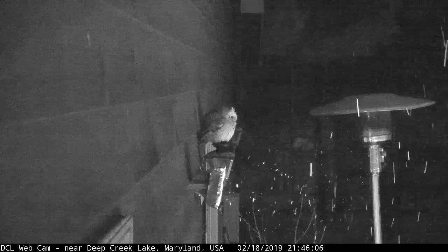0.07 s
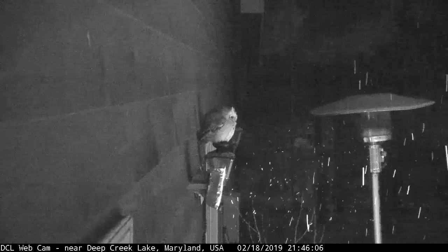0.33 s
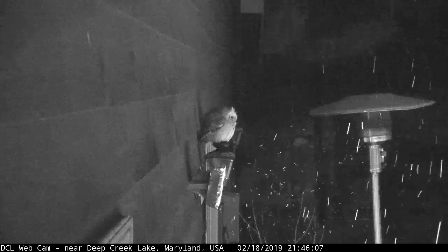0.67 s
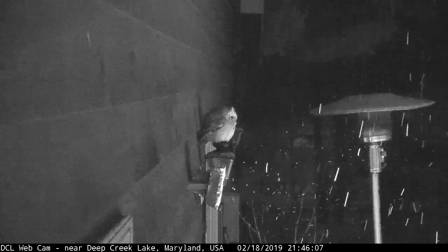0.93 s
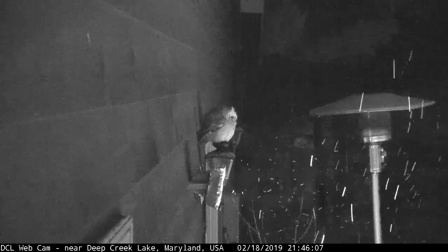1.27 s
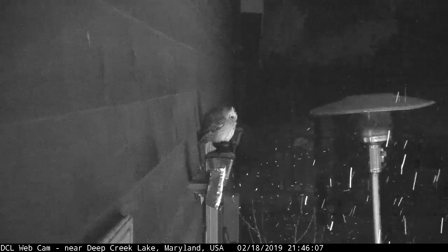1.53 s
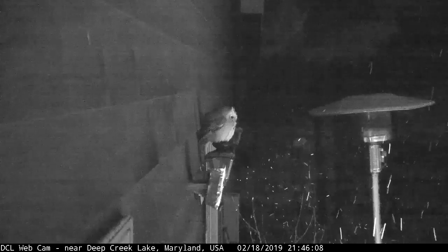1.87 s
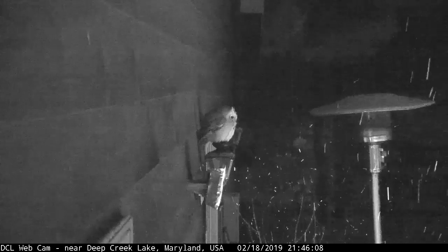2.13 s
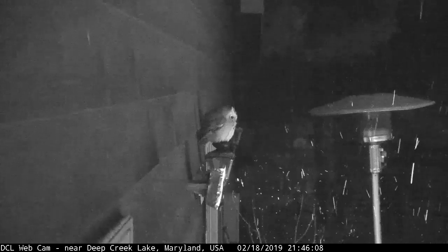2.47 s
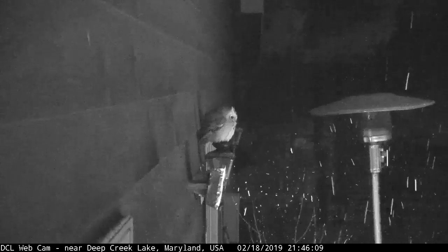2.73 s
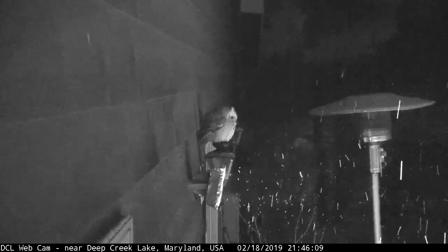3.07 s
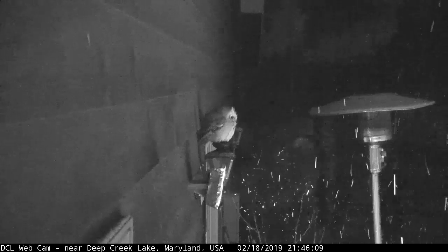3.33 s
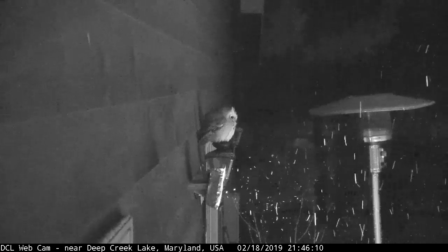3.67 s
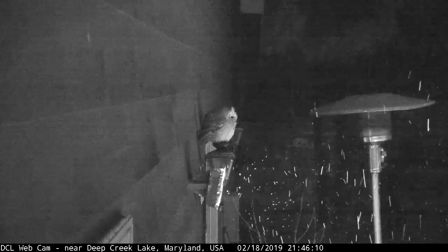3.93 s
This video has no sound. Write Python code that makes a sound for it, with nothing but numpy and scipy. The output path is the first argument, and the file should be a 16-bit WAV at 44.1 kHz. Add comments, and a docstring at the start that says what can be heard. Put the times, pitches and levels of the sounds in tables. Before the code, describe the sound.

A quiet, steady hiss of outdoor night air runs throughout, over a low rumble and a faint machine and electrical hum. Close by, a small mechanism ticks faintly at about 0.7, 1.8, 2.2, 2.8 and 3.8 seconds, and its tiny motor whirs very briefly at 0.8 and 2.2 seconds. From around 3.5 seconds, a soft gust reaches the microphone and the rumble swells.

```python
"""A quiet, snowy night on a deck

An outdoor camera's microphone hears an even hiss over a low rumble of air that swells at the end.
A turning machine and the mains electricity hum faintly. Close by, a small mechanism, probably
the lens drive, ticks now and then, making its casing ring, and twice whirs briefly."""
import sys
import numpy as np
from scipy import signal
from scipy.fft import rfft, irfft
from scipy.io import wavfile

SR = 44100
rng = np.random.default_rng(int(sys.argv[2]) if len(sys.argv) > 2 else 0)


def unload_wav(signal):
    """Save mono or channel-first audio to the path in sys.argv[1] as 16-bit WAV at rate SR, clipped to [-1, 1]."""
    wavfile.write(
        sys.argv[1],
        SR,
        np.round(np.clip(np.atleast_2d(signal).T, -1, 1) * 32767).astype(np.int16),
    )


N = 176400
TIME = np.arange(N) / SR

# Far air and microphone hiss. Each row: frequency in Hz, strength in dB per Hz.
HISS_SPECTRUM = [(60, -71.5), (130, -72), (165, -74), (220, -79), (300, -79), (430, -81.5), (550, -85.5),
                 (900, -86), (1200, -89.5), (2000, -92.5), (3200, -95.5), (5000, -98), (6900, -99),
                 (7500, -104)]
# The rumble of moving air. Each row: frequency in Hz, base strength in dB per Hz.
RUMBLE_SPECTRUM = [(4, -70), (10, -57.5), (25, -60), (38, -63), (58, -60), (78, -65.5), (110, -73.5),
                   (170, -91.5), (400, -115)]
# How the rumble ebbs and returns. Each row: time in seconds, change of level in dB.
RUMBLE_SWELL = [(0, 1), (0.6, -0.5), (1.1, -3), (2.0, 0.5), (3.0, -0.4), (4.0, 2)]
GUST_START_S, GUST_RISE_S, GUST_DB, GUST_EDGE_HZ = 3.53, 0.5, -32, 31.6

# The machine's tones. Each row: multiple of its turning rate, average level in dB.
MACHINE_TONES = [(1, -61), (2, -49.5), (3, -57), (4, -73.5), (5, -75)]
MACHINE_HZ, MACHINE_WANDER, MACHINE_FLUTTER_DB = 47.56, 0.0033, -0.4
# Mains hum and a faint drone. Each row: pitch in Hz, average level in dB.
STEADY_TONES = [(60, -55), (120, -63.5), (485.5, -80)]

# The ticks. Each row: start in seconds, level in dB, final pitch in Hz, gain of the casing's ring in dB.
TICK_EVENTS = [(0.7343, -47.8, 3100, -6), (.7738, -49.2, 3000, -7), (1.7600, -46.5, 3300, -12),
               (2.1740, -50, 2600, -8), (2.3318, -53, 2200, -13), (2.79, -56, 3700, 9.5),
               (3.806, -52, 3400, 2)]
TICK_S, TICK_FROM_HZ = 0.0032, 6520
REBOUND_DELAY_S, REBOUND_LENGTH_S, REBOUND_DB = 0.0041, 0.0015, -4.5
CASING_HZ, CASING_WIDTH_HZ = 5200, 810

# The whirs. Each row: start in seconds, length in seconds, whine level in dB,
# rattle level in dB compared with the whine.
WHIR_EVENTS = [(0.78, 0.13, -64, -1), (2.176, .153, -63, -5)]
# The whine's pitches. Each row: multiple of the motor's step rate, relative level in dB.
WHINE_BANDS = [(1, 2), (2, 1), (3, 1), (4, 1), (5, -8)]
MOTOR_STEP_HZ, WHINE_WIDTH_HZ, WHIR_FADE_S = 1480, 74, 0.0069
RATTLE_PER_S, RATTLE_BAND_HZ = 600, (2500, 7200)
CUTOFF_HZ = 7520


def from_db(db):
    """Turn decibels into a number to multiply by."""
    return 10 ** (np.asarray(db) / 20)


def rms_one(x):
    """Scale a sound so its average level (rms) is 1."""
    return x / np.sqrt(np.mean(x ** 2) + 1e-20)


def coloured_noise(spectrum):
    """Steady noise with the given strength at each frequency."""
    hz, db = np.transpose(spectrum)
    bins = np.maximum(np.arange(N // 2 + 1) * SR / N, 1)
    gain = from_db(np.interp(np.log(bins), np.log(hz), db))
    return irfft(rfft(rng.standard_normal(N)) * gain, N) * np.sqrt(SR / 2)


def slow_noise(edge_hz):
    """A random wobble, mostly slower than edge_hz."""
    low_pass = signal.butter(4, edge_hz, fs=SR, output="sos")
    return rms_one(signal.sosfilt(low_pass, rng.standard_normal(N + SR))[SR:])


def resonate(x, hz, width_hz):
    """Let a sound ring at one pitch and weaken the rest."""
    r = np.exp(-np.pi * width_hz / SR)
    feedback = [1, -2 * r * np.cos(2 * np.pi * hz / SR), r * r]
    return signal.lfilter(np.array([1, 0, -1]) * (1 - r * r) / 2, feedback, x)


def tone(phase, db):
    """A pure tone that starts anywhere in its cycle."""
    return np.sqrt(2) * from_db(db) * np.sin(phase + rng.uniform(0, 2 * np.pi))


def air():
    """Moving air rumbles under the hiss, and a soft gust reaches the microphone at the end."""
    rumble = from_db(np.interp(TIME, *np.transpose(RUMBLE_SWELL))) * coloured_noise(RUMBLE_SPECTRUM)
    hiss = coloured_noise(HISS_SPECTRUM)
    rise = np.clip((TIME - GUST_START_S) / GUST_RISE_S, 0, 1)
    gust = from_db(GUST_DB) * rise * slow_noise(GUST_EDGE_HZ)
    return hiss + rumble + gust


def hum():
    """A machine turns at a nearly even speed, beside steady mains hum and a faint drone."""
    turns_per_s = MACHINE_HZ * (1 + MACHINE_WANDER * slow_noise(edge_hz=0.96))
    angle = 2 * np.pi * np.cumsum(turns_per_s) / SR
    machine = sum(tone(round(multiple) * angle, db + MACHINE_FLUTTER_DB * slow_noise(edge_hz=1.7))
                  for multiple, db in MACHINE_TONES)
    return machine + sum(tone(2 * np.pi * hz * TIME, db) for hz, db in STEADY_TONES)


def click(start_s, length_s, end_hz):
    """A click whose highs arrive first, so its pitch falls quickly."""
    progress = np.clip((TIME - start_s) / length_s, 0, 1)
    cycles = length_s * (TICK_FROM_HZ * progress + (end_hz - TICK_FROM_HZ) * progress ** 2 / 2)
    return np.sin(np.pi * progress) * np.sin(2 * np.pi * cycles)


def ticks():
    """The mechanism clicks, then bounces back more softly; both make its casing ring briefly."""
    out = 0
    for start, db, end_hz, ring_db in TICK_EVENTS:
        rebound = from_db(REBOUND_DB) * click(start + REBOUND_DELAY_S, REBOUND_LENGTH_S, end_hz)
        knock = click(start, TICK_S, end_hz) + rebound
        ring = from_db(ring_db) * resonate(knock, CASING_HZ, CASING_WIDTH_HZ)
        out += from_db(db) * (knock + ring)
    return out


def whirs():
    """A tiny motor runs in short bursts: its steps make a rough whine, with a fine rattle."""
    whine = 0
    for multiple, db in WHINE_BANDS:
        pitch_hz = round(multiple) * MOTOR_STEP_HZ
        whine += from_db(db) * resonate(rng.standard_normal(N), pitch_hz, WHINE_WIDTH_HZ)
    whine = rms_one(whine)
    taps = (rng.random(N) < RATTLE_PER_S / SR) * rng.standard_normal(N) + 1e-18
    band_pass = signal.butter(2, RATTLE_BAND_HZ, "band", fs=SR, output="sos")
    rattle = rms_one(signal.sosfilt(band_pass, taps))
    out = 0
    for start, length, db, rattle_db in WHIR_EVENTS:
        running = np.clip(np.minimum(TIME - start, start + length - TIME) / WHIR_FADE_S, 0, 1)
        out += from_db(db) * running * (whine + from_db(rattle_db) * rattle)
    return out


def scene():
    """All the sounds meet at one microphone."""
    return (air() + hum() + ticks() + whirs())[None, :]


def record(dry):
    """The camera sharply cuts off the highest sounds."""
    hz = np.arange(N // 2 + 1) * SR / N
    return irfft(rfft(dry) / np.sqrt(1 + (hz / CUTOFF_HZ) ** 400), N)


dry = scene()
out = record(dry)
unload_wav(out)
```